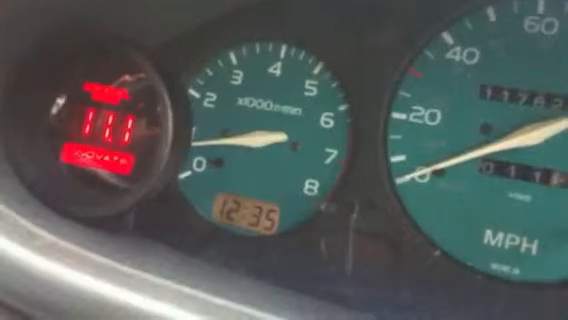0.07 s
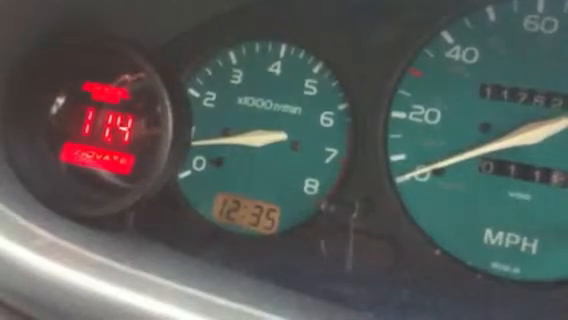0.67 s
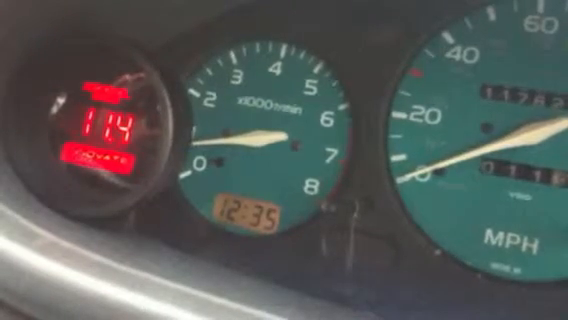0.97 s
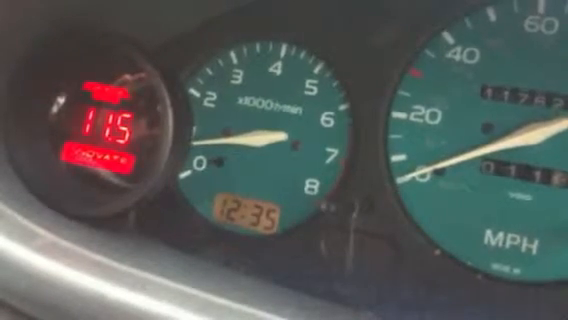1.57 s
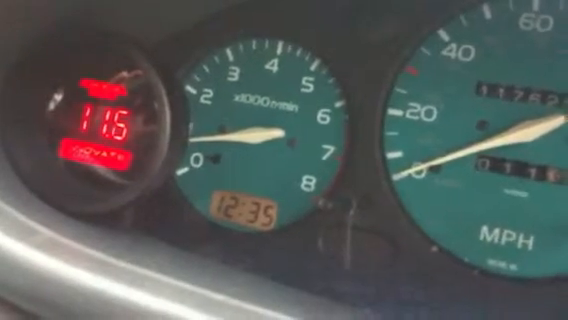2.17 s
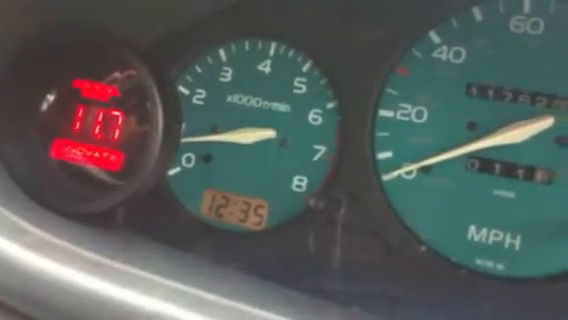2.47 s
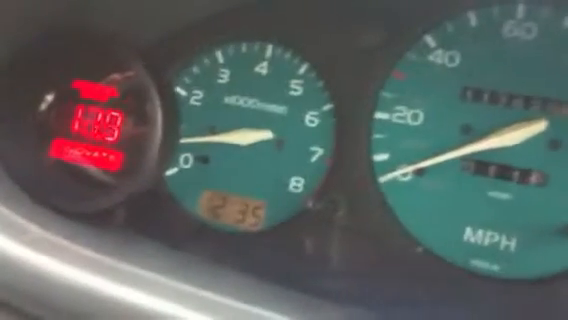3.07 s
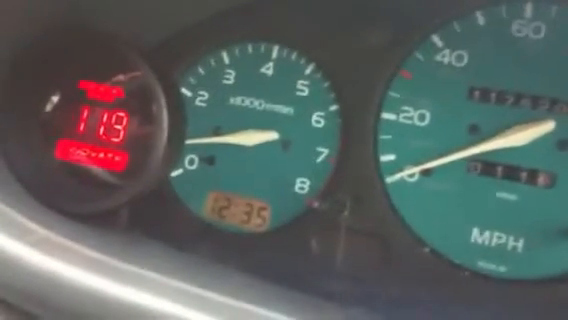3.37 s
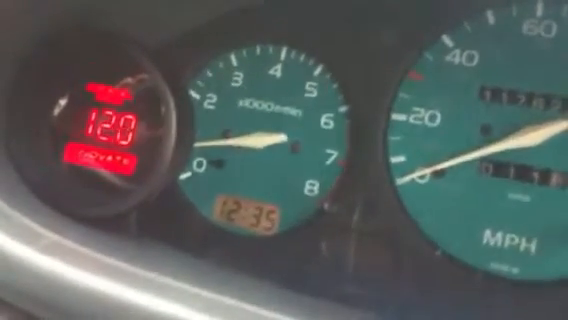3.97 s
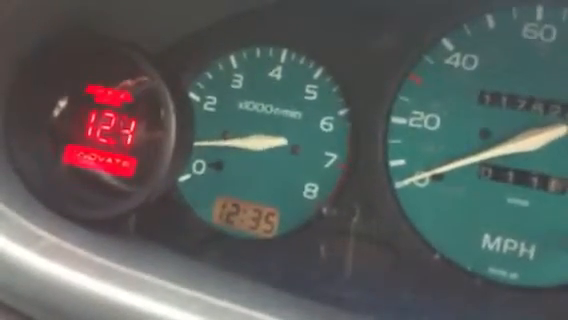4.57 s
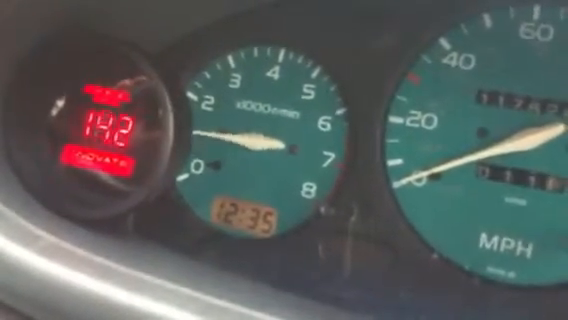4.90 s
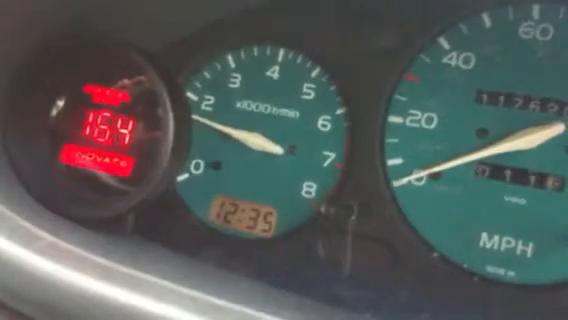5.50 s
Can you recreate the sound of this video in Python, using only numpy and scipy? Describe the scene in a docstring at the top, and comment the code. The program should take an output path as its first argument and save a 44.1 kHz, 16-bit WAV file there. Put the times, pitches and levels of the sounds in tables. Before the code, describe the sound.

From the driver's seat, a lumpy four-cylinder idle, brief cloth rustling and small clicks, then the engine speed rises smoothly.

```python
"""A four-cylinder car engine idles with an uneven beat, heard from the driver's seat, then revs to
about 1800 rpm. Its firings make a stack of tones that swell as they pass through the booms
(resonances) of exhaust and cabin. Gas rushes, valves and belts chatter, and the fuel pump whines
steadily. Close by, a sleeve rustles, small plastic things click and a trim panel is knocked."""
import sys
import numpy as np
from scipy.fft import rfft, irfft, next_fast_len
from scipy.io import wavfile
from scipy.ndimage import map_coordinates

SR = 44100
rng = np.random.default_rng(int(sys.argv[2]) if len(sys.argv) > 2 else 0)


def file_out(sig):
    """Save sig as 16-bit WAV at sys.argv[1]."""
    # one column per channel
    cols = np.atleast_2d(sig).T
    # limit, then scale
    lim = np.clip(cols, -1, 1)
    pcm = np.round(lim * 32767).astype(np.int16)
    wavfile.write(sys.argv[1], SR, pcm)


N = 253134
TIME = np.arange(N) / SR  # seconds
IDLE_RPM, PEDAL_S = 885.3, 4.24  # the pedal goes down once and stays down

# Tones of the exhaust pulses. An order counts vibrations per engine cycle (two turns of the crank);
# multiples of 4 come from the regular firings. (order [per cycle], relative level [dB])
EXHAUST_TONES = [(4, 0.4), (8, 5.6), (9, -16.2), (12, 5.1), (13, -7.8), (15, -7.0), (16, 4.8), (17, -11.1),
                 (18, -14.1), (19, -7.8), (20, 4.7), (22, -10.6), (24, 3.8), (26, -8.8), (27, -1.5),
                 (28, 2.7), (29, -10.1), (30, -9.7), (31, -11.7), (32, -6.1), (35, -7.8), (36, -2.0),
                 (40, -5.3)]


def exhaust(cycle, octaves, jitter_cycles=0.0011, scatter_db=0.4, boom_lag_s=0.016, round_rpm=1580):
    """Four firings a cycle; one odd cylinder adds the tones in between, which make the idle uneven."""
    cycle_hz = np.interp(TIME - boom_lag_s, TIME, np.gradient(cycle) * SR)  # the booms answer late
    position = cycle + jitter_cycles * wobble(30)  # no firing comes exactly on time
    firing_at, odd_at = 0.151, -0.093  # places within the cycle
    odd_strength = amp(wobble(2.5) - 6 * octaves)  # the cylinders even out with speed
    # above round_rpm the pulses turn rounder: tones above order 10 fade
    rounding_db = -27 * np.maximum(octaves - np.log2(round_rpm / IDLE_RPM), 0)
    out = np.zeros(N)
    for order, db in EXHAUST_TONES:
        at, strength = (odd_at, odd_strength) if order % 4 else (firing_at, 1)
        tone = booms(order * cycle_hz) * np.exp(2j * np.pi * order * (position - at))
        fade_db = rounding_db * max(np.log2(order / 10), 0)
        out += amp(db + fade_db) * strength * tone.real
    return np.sqrt(2) * amp(firing_level(octaves) + scatter_db * wobble(30)) * out


# Pitches at which exhaust and cabin boom. (pitch [Hz], width [Hz], level [dB], sign at the seat [+/-1])
RESONANCES = [(59.2, 5.7, -14.3, -1), (98.5, 5.3, -16.5, 1), (126.8, 9.5, 7.8, 1), (139.3, 4.4, 6.3, -1),
              (165.4, 60.4, -6.0, -1), (195.7, 10.7, -0.4, 1), (220.4, 13.4, -8.3, -1),
              (254.2, 9.0, -12.9, -1), (347.7, 81.4, -22.0, 1), (420.6, 30.1, -10.2, -1),
              (470.7, 36.3, -12.7, 1)]


def booms(hz):
    """How much exhaust and cabin boost and shift a tone of pitch hz, as a complex gain."""
    f = np.arange(0, 700, 0.5)
    gain = sum(sign * amp(db) * 1j * f * width / (pitch ** 2 - f ** 2 + 1j * f * width)
               for pitch, width, db, sign in RESONANCES)
    return np.interp(hz, f, gain)


# Weaker and stronger firings as the engine picks up. (time [s], half length [s], level change [dB])
STUMBLES = [(4.373, 0.033, -5.5), (4.458, 0.034, -2.5), (4.6, .025, -5), (4.83, 0.08, -3.5),
            (4.99, 0.017, 0.5)]


def firing_level(octaves, idle_db=-45, creep_db_per_s=0.36, throttle_db=9.5, build_s=0.46):
    """Strength of the firings in dB: it builds with the throttle, stumbles, and eases at speed."""
    throttle = np.sin(np.pi / 2 * np.clip((TIME - PEDAL_S) / build_s, 0, 1)) ** 2
    creep_db = creep_db_per_s * np.minimum(TIME, PEDAL_S)
    stumble_db = sum(db * swell(s, half_length) for s, half_length, db in STUMBLES)
    return idle_db + creep_db + throttle_db * throttle - 3 * octaves + stumble_db


def crank_rpm(creep_rpm_per_s=2.57, rev_rpm=1120, intake_s=0.16, flywheel_s=0.83):
    """The idle creeps up; after the pedal the intake fills with air, then the flywheel gathers speed."""
    age = np.maximum(TIME - PEDAL_S, 0)
    flywheel_lag = flywheel_s * np.exp(-age / flywheel_s)
    intake_lag = intake_s * np.exp(-age / intake_s)
    progress = 1 - (flywheel_lag - intake_lag) / (flywheel_s - intake_s)
    return IDLE_RPM + creep_rpm_per_s * np.minimum(TIME, PEDAL_S) + rev_rpm * progress


# The low rush of exhaust gas. (frequency [Hz], relative level [dB])
GAS_SPECTRUM = [(30, -34), (70, -16.5), (110, -4), (140, 10), (165, -5.5), (205, 11), (250, -3), (310, -4),
                (370, -8.5), (440, -2), (560, -5.5), (720, -15.5), (850, -19), (1500, -43.5)]


def gas_rush(cycle, octaves, start_db=-49, creep_db_per_s=0.98, db_per_octave=0.9):
    """Swirling gas leaves in puffs, one for each firing; it grows through the idle and with speed."""
    rush_db = start_db + creep_db_per_s * np.minimum(TIME, PEDAL_S) + db_per_octave * octaves
    puffs = 1 + 0.045 * np.cos(2 * np.pi * 4 * cycle)
    uneven_beat = 1 + 0.031 * np.cos(2 * np.pi * cycle)
    return amp(rush_db) * unit(puffs * uneven_beat * noise(GAS_SPECTRUM))


# The chatter of valves and belts. (frequency [Hz], relative level [dB])
CHATTER_SPECTRUM = [(300, -0.5), (800, -1.5), (980, 3), (1080, 4), (1250, 0.5), (1340, 1), (1560, -6.5),
                    (1900, -4.5), (2300, -11.5), (3000, -13), (3700, -18), (4800, -19.5), (7000, -26),
                    (15000, -48.5)]


def engine_bay(cycle, octaves, idle_db=-62, db_per_octave=6, rasp_db=-66):
    """Valves and belts chatter behind the cabin wall; with speed they get louder and raspier."""
    taps = 1 + 0.05 * np.cos(2 * np.pi * 8 * cycle)
    chatter = amp(idle_db + db_per_octave * octaves) * noise(CHATTER_SPECTRUM)
    rasp = amp(rasp_db) * octaves ** 2 * band(rng.standard_normal(N), hz=2400, width_hz=1400)
    return taps * (chatter + rasp)


# The sound of sliding cloth. (frequency [Hz], relative level [dB])
CLOTH_SPECTRUM = [(500, -18.5), (1000, 8), (1400, -1), (1650, 3), (2300, -3), (3200, -4), (3900, -5.5),
                  (4650, -5), (5300, -6.5), (9000, -10), (12000, -14), (15500, -17.5)]
# Strokes of the sleeve. (start [s], length [s], level [dB])
SLEEVE_STROKES = [(2.497, 0.28, -51.5), (2.787, 0.13, -58.5), (3.136, 0.22, -64), (3.318, 0.17, -59.5),
                  (3.76, 0.083, -63), (4.006, .12, -62)]


def sleeve(attack_s=0.034, sag_db_per_s=-15, release_s=0.14, catch_db=2, snag_db=-0.8):
    """Cloth slides in tiny catches and slower snags; each stroke starts briskly and slackens."""
    pressure = np.zeros(N)
    for start, length, db in SLEEVE_STROKES:
        age = np.maximum(TIME - start, 0)
        rise = np.minimum(age / attack_s, 1) ** 2
        fall = np.exp(-np.maximum(age - length, 0) / release_s)
        pressure = np.maximum(pressure, rise * fall * amp(db + sag_db_per_s * age))
    catches = amp(catch_db * wobble(900) + snag_db * wobble(70))
    return pressure * unit(noise(CLOTH_SPECTRUM) * catches)


# Small plastic clicks. (time [s], level [dB], ring pitch [Hz], relative ring [dB], treble limit [Hz])
PLASTIC_CLICKS = [(2.9245, -38.5, 5000, -13, 24000), (3.34, -60, 5500, -14, 16000),
                  (3.4545, -49, 1580, -2, 3200), (3.969, -63, 4950, 3.5, 18000),
                  (4.294, -55, 2970, -16, 12000), (5.474, -51, 2630, -14, 6400)]


def clicks():
    """Sudden contacts that die at once and leave a brief ring."""
    return sum(amp(db) * contact(s, ring_hz, ring_db, treble_hz, rise_s=0.0008, fade_s=0.028,
                                 ring_sharpness=40, ring_fade_s=0.08, knock_db=-3)
               for s, db, ring_hz, ring_db, treble_hz in PLASTIC_CLICKS)


# Brief scuffs. (peak time [s], level [dB], rise [s], ring pitch [Hz], relative ring [dB])
SCUFFS = [(2.551, -60, .015, 1750, 7), (2.79, -67.5, 0.088, 4670, 5), (3.415, -62.5, 0.014, 5450, 2),
          (3.456, -46, 0.013, 6200, -11)]


def scuffs():
    """Sliding contacts that swell before they let go."""
    return sum(amp(db) * contact(s, ring_hz, ring_db, treble_hz=13500, rise_s=rise_s, fade_s=0.081,
                                 ring_sharpness=20, ring_fade_s=0.084, knock_db=-13)
               for s, db, rise_s, ring_hz, ring_db in SCUFFS)


def contact(s, ring_hz, ring_db, treble_hz, rise_s, fade_s, ring_sharpness, ring_fade_s, knock_db):
    """A touch at time s: a scrape, a ring of plastic and a knock of the panel behind it."""
    near = np.abs(TIME - s) < 0.15
    age = TIME[near] - s
    rise = np.exp(np.minimum(age, 0) / rise_s)
    shape = lambda seconds: rise * amp(-60 * np.maximum(age, 0) / seconds)  # falls 60 dB in that time
    scrape_colour = lambda f: f / np.hypot(f, 700) ** 1.48 / np.hypot(1, (f / treble_hz) ** 3)
    scrape_noise, ring_noise, knock_noise = rng.standard_normal((3, len(age)))
    scrape = unit(filtered(scrape_noise, scrape_colour))
    ring = amp(ring_db) * band(ring_noise, ring_hz, ring_hz / ring_sharpness)
    knock = amp(knock_db) * band(knock_noise, hz=660, width_hz=150)
    out = np.zeros(N)
    out[near] = shape(fade_s) * (scrape + knock) + shape(ring_fade_s) * ring
    return out


# Dull knocks on a trim panel. (time [s], level [dB])
PANEL_KNOCKS = [(3.578, -55), (5.135, -39.5)]
# The panel's own tones. (pitch [Hz], relative level [dB], time to fade by 60 dB [s])
PANEL_TONES = [(712, 5, 0.046), (1032, -2.5, 0.11), (1160, 3, .04), (1335, -13, 0.046), (1630, -5, 0.041)]


def knocks(attack_s=0.0012, thud_db=-3, thud_fade_s=0.041):
    """A soft blow rings the trim panel over a short dull thud."""
    out = np.zeros(N)
    for s, db in PANEL_KNOCKS:
        age = np.maximum(TIME - s, 0)
        ring = sum(amp(tone_db - 60 * age / fade_s) * np.sin(2 * np.pi * hz * age)
                   for hz, tone_db, fade_s in PANEL_TONES)
        thud_noise = band(rng.standard_normal(N), hz=900, width_hz=1100)
        thud = amp(thud_db - 60 * age / thud_fade_s) * thud_noise
        out += amp(db) * (1 - np.exp(-age / attack_s)) * (ring + thud)
    return out


# Tones of the fuel pump's whine. (pitch [Hz], level [dB])
PUMP_TONES = [(340, -68), (680, -64.5), (1020, -64.5), (1180, -75), (1700, -76.5), (1870, -79)]


def fuel_pump():
    """The electric pump holds its pitch whatever the engine does."""
    return sum(amp(db) * wavering_tone(hz) for hz, db in PUMP_TONES)


# Swells of a thin hum. (peak time [s], half length [s], level [dB])
HUM_SWELLS = [(2.62, .25, -61), (3.27, .2, -56), (3.63, .2, -50.5), (4.16, .26, -52.5)]


def hum(hz=477.7):
    """One thin tone comes and goes."""
    loudness = sum(amp(db) * swell(s, half_length) for s, half_length, db in HUM_SWELLS)
    return loudness * wavering_tone(hz)


# The background hiss. (frequency [Hz], relative level [dB])
HISS_SPECTRUM = [(30, 10.5), (1000, 0), (3000, 8), (5000, 6), (8000, 5), (11000, 2), (16000, 4.5)]


def hiss(level_db=-71.5):
    """A faint, even hiss lies under everything."""
    return amp(level_db) * noise(HISS_SPECTRUM)


def amp(db):
    """Turn decibels into a gain to multiply by."""
    return 10 ** (np.asarray(db) / 20)


def unit(x):
    """Scale x to an average (rms) level of 1."""
    return x / np.sqrt(np.mean(x ** 2) + 1e-20)


def wobble(rate):
    """A smooth curve through `rate` random values a second."""
    return map_coordinates(rng.standard_normal(int(N * rate / SR) + 4), [TIME * rate])


def swell(s, half_length):
    """A bell-shaped bump of height 1 around time s."""
    return np.exp(-((TIME - s) / half_length) ** 2)


def wavering_tone(hz, waver_db=1.2, drift_radians=0.24):
    """A pure tone of level about 1 that wavers slightly."""
    loudness = np.sqrt(2) * amp(waver_db * wobble(12))
    return loudness * np.sin(2 * np.pi * hz * TIME + drift_radians * wobble(9))


def filtered(x, response):
    """Multiply each frequency in x by response(frequency)."""
    size = next_fast_len(len(x) + SR // 2)
    return irfft(rfft(x, size) * response(np.fft.rfftfreq(size, 1 / SR)), size)[:len(x)]


def noise(spectrum):
    """Noise of level 1, shaped by a table of (frequency [Hz], relative level [dB])."""
    hz, db = np.transpose(spectrum)
    response = lambda f: amp(np.interp(np.log(f + 1), np.log(hz), db))
    return unit(filtered(rng.standard_normal(N), response))


def band(x, hz, width_hz):
    """The part of x around one pitch, scaled to level 1."""
    return unit(filtered(x, lambda f: 1 / (1 + ((f - hz) / width_hz) ** 2)))


def scene():
    """Engine, nearby small sounds and background add up in one channel."""
    rpm = crank_rpm()
    cycle = np.cumsum(rpm / 60 / 2) / SR  # engine cycles so far, two turns each
    octaves = np.log2(rpm / IDLE_RPM)  # doublings of speed above idle
    engine = exhaust(cycle, octaves) + gas_rush(cycle, octaves) + engine_bay(cycle, octaves)
    nearby = sleeve() + clicks() + scuffs() + knocks()
    return (engine + nearby + fuel_pump() + hum() + hiss())[None]


def record(dry):
    """Cut off the very highest treble."""
    return filtered(dry[0], lambda hz: hz < 15800)[None]


dry = scene()
out = record(dry)
file_out(out)
```